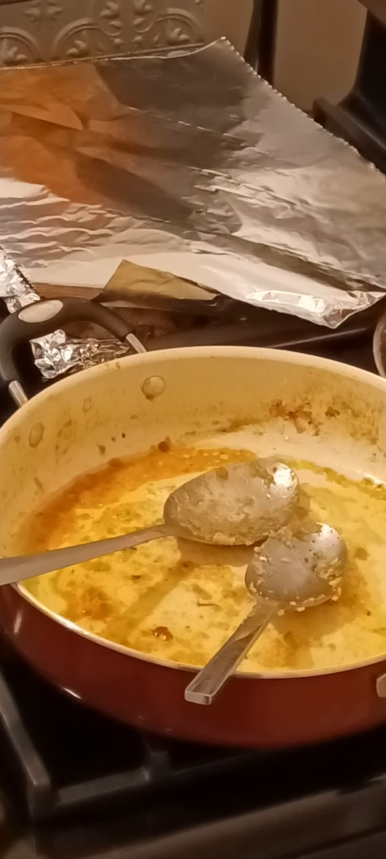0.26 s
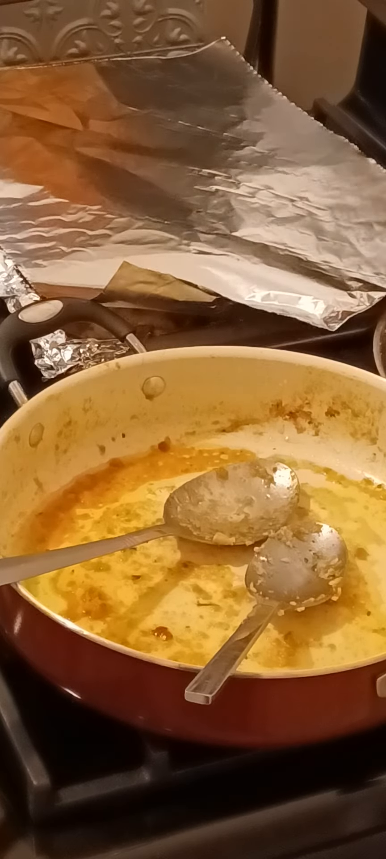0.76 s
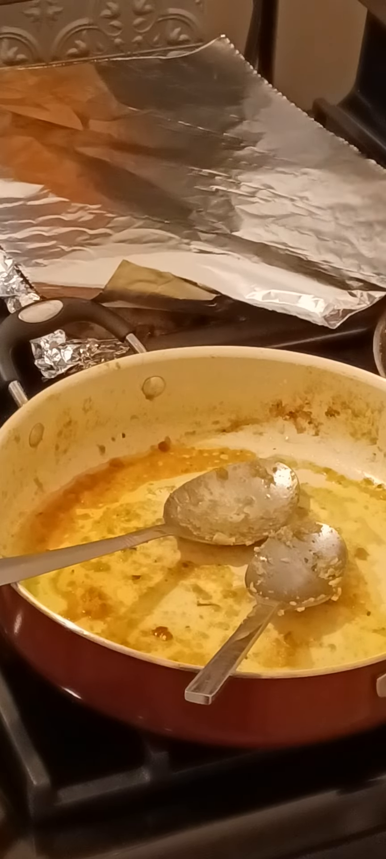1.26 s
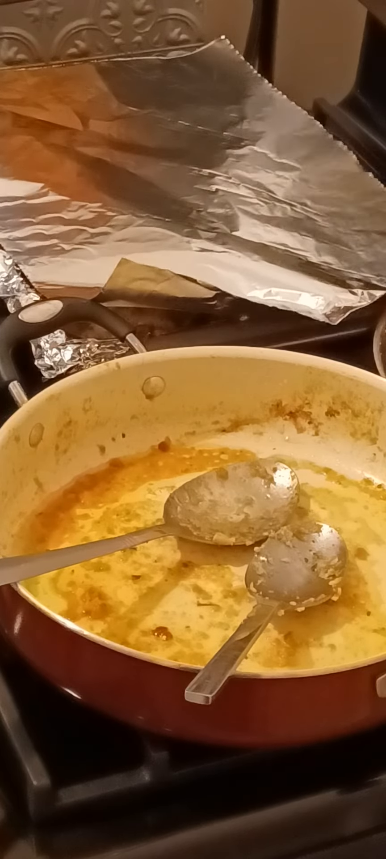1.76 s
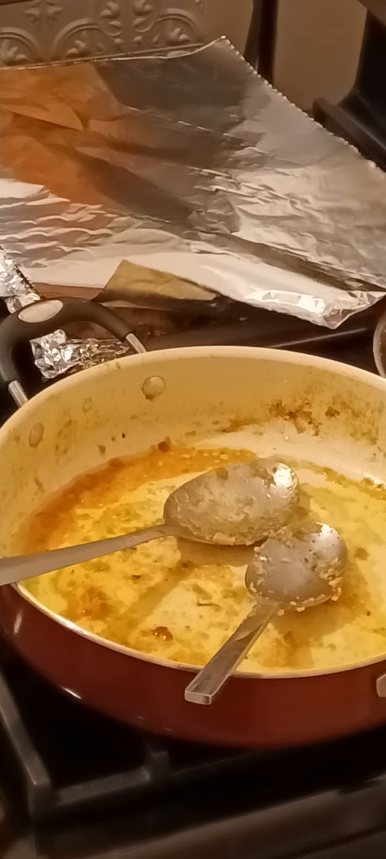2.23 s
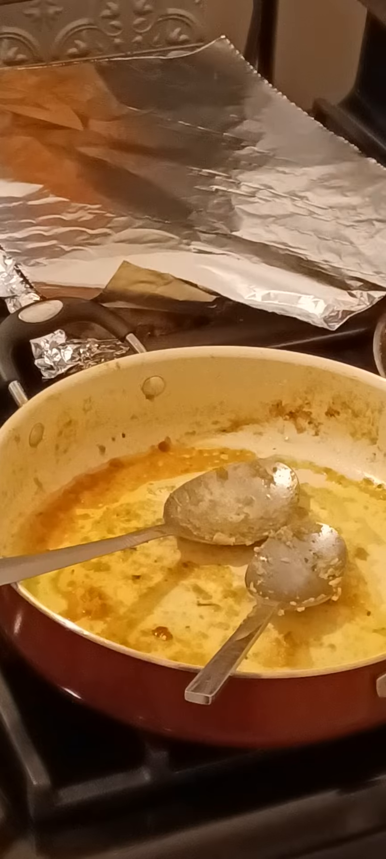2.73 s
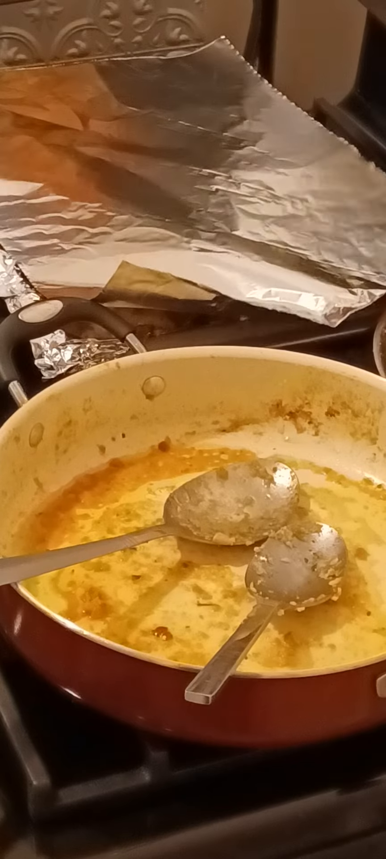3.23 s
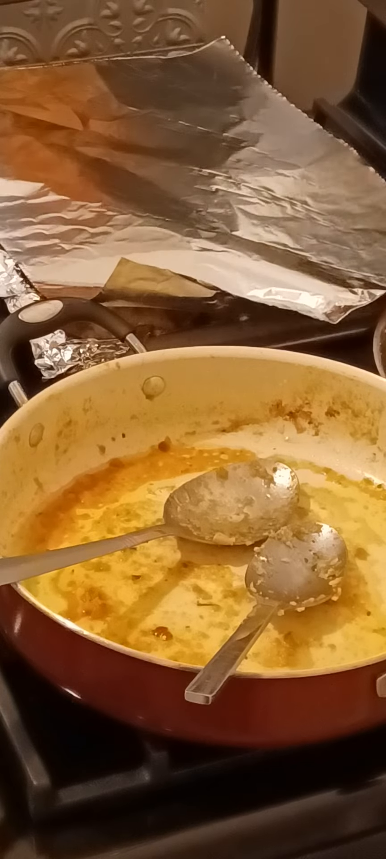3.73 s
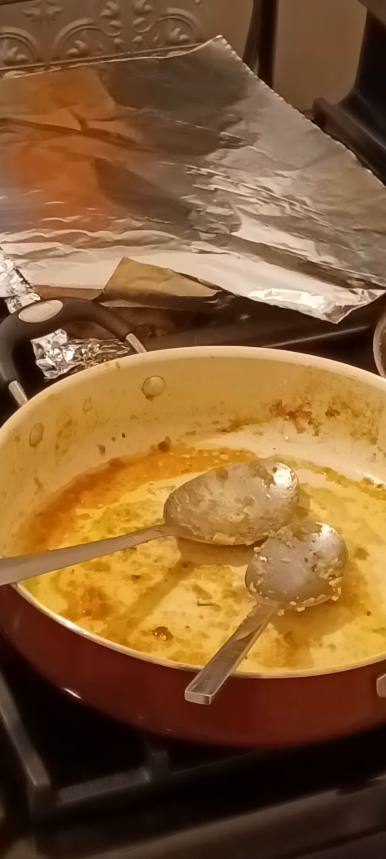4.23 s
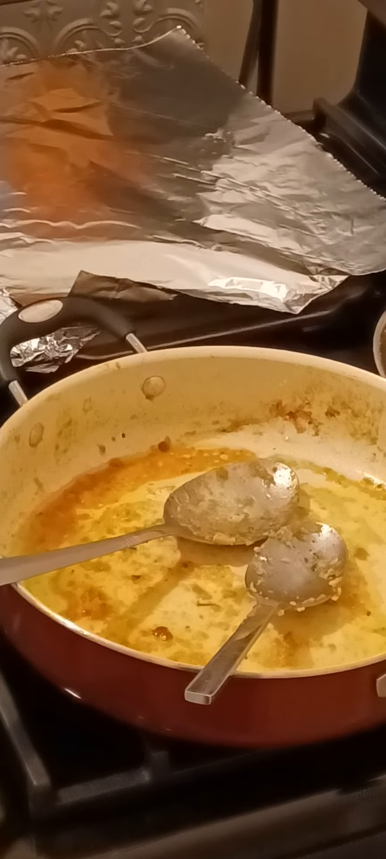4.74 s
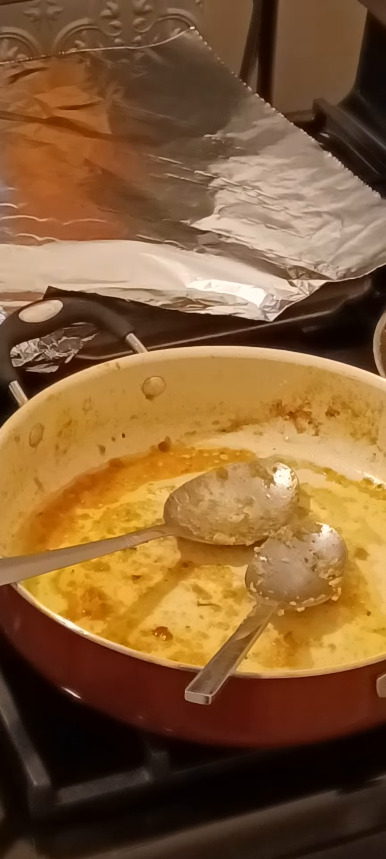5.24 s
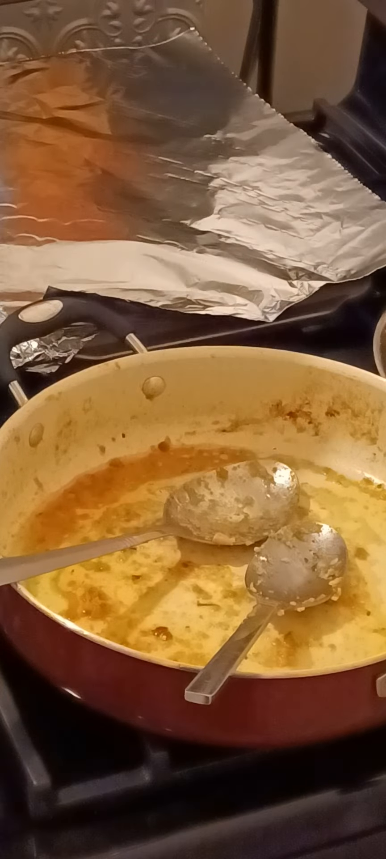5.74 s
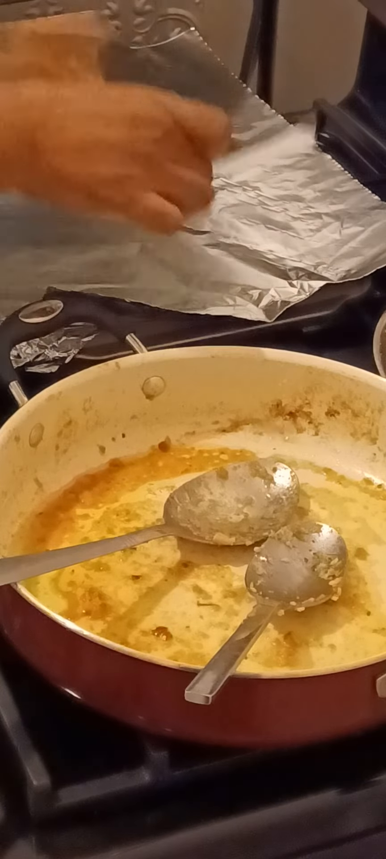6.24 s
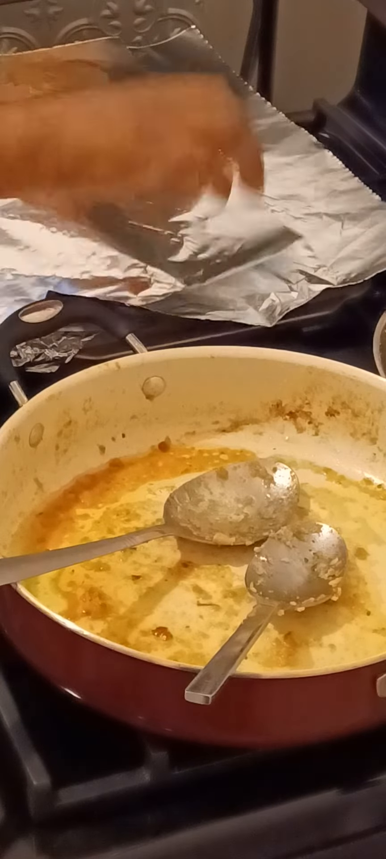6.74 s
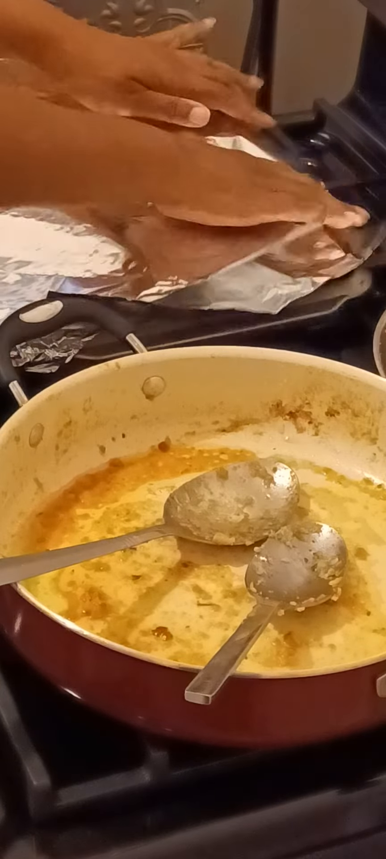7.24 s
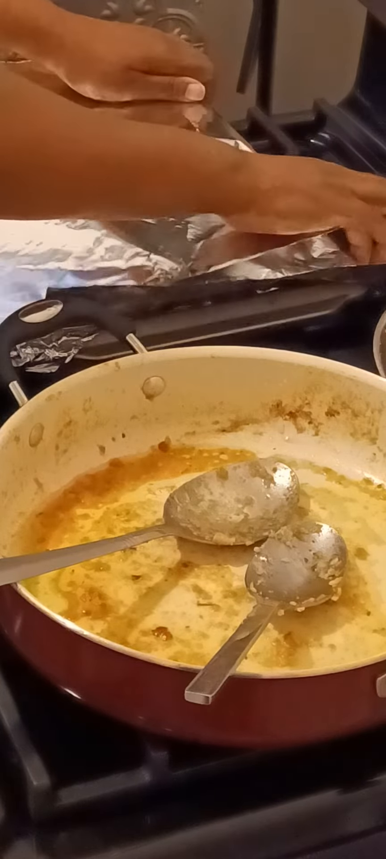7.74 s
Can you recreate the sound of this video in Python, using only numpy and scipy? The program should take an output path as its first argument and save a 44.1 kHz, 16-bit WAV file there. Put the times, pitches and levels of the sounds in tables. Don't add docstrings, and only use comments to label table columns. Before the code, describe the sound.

Dry, glittering aluminium foil crackle swells and fades irregularly as it is pressed over a ringing dish, with a low fridge drone behind.

```python
import sys
import numpy as np
from scipy import signal
from scipy.fft import rfft, irfft
from scipy.io import wavfile

SR = 44100
rng = np.random.default_rng(int(sys.argv[2]) if len(sys.argv) > 2 else 0)


def wav_out(sig):
    wavfile.write(sys.argv[1], SR, np.round(np.clip(np.atleast_2d(sig).T, -1, 1) * 32767).astype(np.int16))


def volts(x):
    e = np.asarray(x, float) / 20
    return 10 ** e


N = 351918
T = np.arange(N) / SR
HZ = np.fft.rfftfreq(N, 1 / SR) + 1e-3
TOP_HZ = 15830


def unit(x):
    return x / np.sqrt(np.mean(x ** 2))


def on_log(table):
    f, value = np.array(table).T
    return np.interp(np.log(HZ), np.log(f), value)


def curves(table):
    s, *columns = np.transpose(table)
    return [np.interp(T, s, c) for c in columns]


def peak(hz, width_hz):
    return 1 / (1 + 1j * (HZ ** 2 - hz ** 2) / (HZ * width_hz))


def band(lo_hz, hi_hz, order=3):
    low_cut = 1 + (lo_hz / HZ) ** (2 * order)
    high_cut = 1 + (HZ / hi_hz) ** (2 * order)
    return 1 / (low_cut * high_cut)


def tone(hz, wander_hz, t=T):
    steps = rng.standard_normal(400)
    drift = np.interp(t, np.linspace(0, N / SR, 400), steps)
    phase = 2 * np.pi * (hz * t + wander_hz * np.cumsum(drift) / SR) + 2 * steps[0]
    apart = steps[1] * min(hz / 900, 1.5) * np.array([[.5], [-.5]])
    return np.sqrt(2) * np.sin(phase + apart)


def swell(s, length):
    return np.cos(np.pi * np.clip((T - s) / length, -.5, .5)) ** 2


# f/Hz, likeness/0-1
PORT_LIKENESS = [(25, 0.6), (60, 0.5), (130, 0.99), (290, 0.8), (640, 0.29), (1400, 0)]


def port_likeness():
    return np.clip(on_log(PORT_LIKENESS), 0, 1)


def stereo_noise():
    like = port_likeness()
    mid, side = rfft(rng.standard_normal((2, N)))
    return np.sqrt(1 + like) * mid + np.sqrt(1 - like) * side * np.array([[1], [-1]])


def hiss():
    return volts(-76) * rfft(rng.standard_normal((2, N))) * band(20, 13000, order=2)


def flutter():
    rate_hz, depth_db = 21.92, 2.5
    steps = rng.standard_normal(400)
    return volts(depth_db * np.interp(T * rate_hz, np.arange(400), steps))


# t/s, length/s, level/dB
PANEL_THROBS = [(0.102, 0.067, -51.1), (0.297, 0.39, -51.5), (0.56, 0.43, -48.5), (0.83, 0.83, -51.5),
                (1.22, 0.18, -44.4), (1.46, 0.61, -46), (1.766, 0.085, -40), (2.26, 0.21, -51.0),
                (2.505, 0.32, -52), (2.874, 0.42, -48.5), (3.23, 0.3, -46), (3.44, 0.08, -49.5),
                (3.675, 0.29, -45), (3.876, 0.19, -48.5), (4.08, 0.24, -47.5), (4.25, 0.14, -50),
                (4.387, 0.14, -46), (4.617, 0.63, -42.5), (5.084, 0.21, -47), (5.237, 0.086, -49),
                (5.37, 0.14, -48.1), (5.633, 0.51, -47), (6.015, 0.19, -49), (6.23, 0.14, -48.5),
                (6.459, 0.46, -49.2), (6.75, 0.33, -47), (7.0, 0.36, -49.5), (7.245, 0.38, -45),
                (7.69, 0.76, -46), (7.966, 0.1, -44)]


def panel():
    throb = sum(volts(db) * swell(s, length) for s, length, db in PANEL_THROBS)
    return volts(1.0) * throb * tone(225.2, 7.95) * flutter()


# t/s, air level/dB, rumble minus air/dB
FRIDGE_LEVEL = [(0, -55, -4), (.3, -51, -6.5), (1.6, -51.5, -5.5), (1.9, -48.5, -4.5), (2.0, -55.5, -11),
                (2.65, -58.5, -6), (2.95, -57, -3), (3.5, -53.5, -4), (4.2, -53.5, -7), (4.45, -50, -8),
                (4.9, -54.5, -5.5), (5.1, -51.5, -8), (6.5, -52, -6.5), (7.0, -53.5, -7), (7.98, -50.5, -4)]
# f/Hz, wander/Hz, level over air/dB
MOTOR_LINES = [
    (163.5, 1.26, -6.5),
    (333.3, 1.94, -5),
    (318, 7.66, -7),
]
# f/Hz, level/dB per Hz
AIR_COLOUR = [(25, -36), (45, -38.5), (62, -23), (100, -15.5), (170, -6), (222, 0), (325, -9), (390, -13.5),
              (540, -14), (900, -21.5)]


def fridge():
    level, rumble = curves(FRIDGE_LEVEL)
    colour = volts(on_log(AIR_COLOUR))
    upper = volts(3.0) * unit(irfft(stereo_noise() * colour * band(140, 1100), N))
    lower = unit(irfft(stereo_noise() * colour * band(10, 127.4), N))
    lower = lower * volts(np.array([[1.2], [-.9]]))
    lines = sum(volts(db) * tone(f, w) for f, w, db in MOTOR_LINES)
    return volts(level) * (upper + volts(rumble) * lower + lines) + panel()


# t/s, length/s, f/Hz, width/Hz, level/dB
DISH_THUDS = [(2.805, .16, 90, 50, -52), (1.715, .06, 1450, 200, -32), (1.66, .1, 1720, 120, -36),
              (4.42, .3, 850, 700, -50), (4.53, .36, 1450, 600, -51), (4.66, .18, 1050, 500, -53),
              (7.25, .08, 575, 90, -48), (1.68, .12, 1300, 700, -33), (4.42, .2, 550, 120, -56),
              (1.8, .3, 550, 400, -36), (1.73, .1, 750, 400, -35), (1.64, .08, 500, 400, -44),
              (.26, .12, 400, 200, -54), (2.79, .14, 1100, 900, -50)]


def thuds():
    noise = stereo_noise()
    out = np.zeros((2, N))
    for s, length, f, w, db in DISH_THUDS:
        rub = unit(irfft(noise * peak(f, w) ** 2, N))
        out += volts(db) * swell(s, length) * rub
    return out


# f/Hz, wander/Hz, level/dB
DISH_MODES = [(367.6, 58, -37), (398, 13, -54), (530, 19, -47), (594, 19, -57), (777, 25, -32.5),
              (866, 31, -38), (1030, 29.2, -34.5), (1410, 51, -43), (1400, 29, -29.5), (1690, 15, -42),
              (2000, 21, -43), (2010, 15, -31)]
# t/s, length/s, f/Hz, wander/Hz, level/dB
DISH_RINGS = [
    (2.4, 0.11, 260, 13, -56),
    (1.43, 0.46, 474, 4.1, -54.5),
    (1.536, 0.28, 458, 5, -51),
    (4.43, 0.099, 360, 21, -50),
    (3.8, 0.1255, 290, 16, -53),
    (1.76, 0.14, 220, 33, -46),
    (1.9, 0.12, 350, 35, -43),
    (7.78, .4, 575, 28.3, -51.5),
]


def dish():
    press_s, length_s, share_db = 1.77, .38, -3
    press = [(press_s, length_s, f, w, db + share_db) for f, w, db in DISH_MODES]
    out = thuds()
    for s, length, f, w, db in DISH_RINGS + press:
        now = np.abs(T - s) < length / 2
        out[:, now] += volts(db) * swell(s, length)[now] * tone(f, w, T[now])
    return out


# t/s, t60/s, level/dB
DISH_KNOCKS = [
    (2.715, 0.2, -42),
    (2.763, 0.32, -35.5),
]
# f/Hz, wander/Hz, level in first knock/dB, level in second knock/dB
KNOCK_MODES = [(265, 21, -1, 1), (311, 22, -15, 1), (404, 40, -8, -4), (506, 11, 3, -9.5),
               (644, 60, -19, -10.5), (840, 35, -14, -6.5)]


def knocks():
    attack_s = 0.0036
    out = np.zeros((2, N))
    for k, (s, t60, db) in enumerate(DISH_KNOCKS):
        now = (T > s) & (T < s + 1)
        t = T[now] - s
        shape = (1 - np.exp(-t / attack_s)) * volts(db - 60 * t / t60)
        modes = sum(volts(m[2 + k]) * tone(m[0], m[1], T[now]) for m in KNOCK_MODES)
        out[:, now] += shape * modes
    return out


# t/s, lag of the right port/samples
HAND_LAG = [(0, 6), (5.4, 7), (6.1, 21), (8, 21)]


def creases():
    rate, spread_db, shiver_t60_s = 2200, 1.5, 0.2
    direct, tick_db = .12, -26
    chance = rng.random((3, N))
    clicks = (chance[0] < rate / SR) * volts(spread_db * np.log(chance[1] + 1e-9))
    energy = signal.fftconvolve(clicks ** 2, volts(-120 * T[:8192] / shiver_t60_s))[:N]
    shiver = unit(np.sqrt(np.abs(energy)) * rng.standard_normal((3, N)))
    ticks = unit(clicks * np.sign(chance[2] - .5))
    straight = np.sqrt(direct) * shiver[2] + volts(tick_db) * ticks
    lag = curves(HAND_LAG)[0].round()
    late = np.interp(np.arange(N) - lag, np.arange(N), straight)
    return np.sqrt(1 - direct) * shiver[:2] + np.array([straight, late])


# t of peak/s, rise/s, fall/s, level/dB, weight/dB (how much
FOIL_PRESSES = [(0.08, 0.027, 0.24, -49.5, -0.5), (0.22, 0.035, 0.2, -43, -0.5), (0.393, 0.17, 0.26, -39, 2),
                (0.53, 0.034, 1.5, -46.5, 4.5), (0.705, 0.44, 1.14, -33, -1), (0.94, 0.58, 0.35, -39.5, -6),
                (1.037, 0.51, 0.28, -41.5, -0.8), (1.216, 0.34, 0.52, -38.5, -1), (1.41, 0.3, 0.42, -43, 1.5),
                (1.577, 0.073, 0.29, -30.5, -6), (1.625, 0.059, 0.27, -34, 2), (1.675, 0.14, 0.16, -22, 1),
                (1.72, 0.14, 0.2, -21.5, 1.5), (1.79, .2, 0.17, -24, 0), (1.865, 0.38, 0.23, -23.5, -8),
                (2.174, 0.42, 0.39, -39.5, -2), (2.353, 0.07, 0.2, -51, 0.5), (2.501, 0.11, 0.23, -49, -2.5),
            (2.62, .04, .3, -46.5, 0), (2.66, 0.11, 0.62, -39, -6.5), (2.72, 0.053, 0.4, -47.5, 4.5),
            (2.917, 0.3, 0.11, -48, -3.5), (3.189, 0.11, 0.46, -45.5, 0.5), (3.438, 0.04, 0.47, -46, 0.5),
            (3.592, 0.064, 0.28, -52.5, 1), (3.73, 0.13, 0.21, -51.5, 4), (3.955, .03, .2, -56, -3),
            (4.015, 0.1, 0.1, -44, -1.5), (4.077, 0.19, 0.29, -36.5, -1.5), (4.575, 0.15, 0.35, -58, 8.5),
            (4.865, 0.15, 1.0, -53, -12),
                (5.005, 0.088, 0.98, -46.5, -0.5), (5.186, 0.13, 0.47, -34.5, -3), (5.29, 0.09, 0.3, -35.5, -5),
           (5.395, 0.45, 0.13, -41, -0.5), (5.526, 0.13, 0.3, -36, -2), (5.762, 0.28, 0.53, -38, -3),
           (5.818, 0.2, 0.4, -35.5, -1.5), (5.932, 0.095, 0.47, -27.5, -4), (6.119, 0.44, 0.29, -34, -2.5),
           (6.222, 0.1, 0.39, -33, -5.5), (6.32, 0.34, 0.29, -28.5, -6.5), (6.519, 0.27, 0.12, -46.5, 1.5),
           (6.68, 0.052, 0.2, -43, -1.5), (6.75, .2, .15, -41.5, -1.5), (6.81, 0.24, 0.16, -36, -1),
           (7.028, 0.023, 0.14, -54, -9), (7.203, 0.02, 1.4, -38, -0.5), (7.243, 0.05, 0.14, -32, -2.5),
           (7.278, .06, 0.13, -37, -0.5), (7.5, 0.29, 1.2, -44, 0), (7.7, 0.41, 1.4, -42, 3),
           (7.971, 0.28, 1.0, -38.5, 1.5),
                (0.068, .015, .15, -49, -10),
    (7.188, 0.017, 0.26, -44, -8),
    (5.14, .03, 0.12, -44, 1),
    (6.655, .03, 0.152, -44.5, -3),
    (5.6, 0.041, .15, -54, 3),
    (7.42, .05, 0.093, -49.5, 7.5),
    (7.6, .1, .25, -48, 7),
]
# t/s, level/dB
LOOSE_RUSTLE = [(0, -56), (.4, -53.5), (1.5, -55), (2.0, -65), (2.6, -55.5), (3.9, -56), (4.25, -56.5),
                (4.4, -57.5), (4.75, -59.5), (5.2, -55), (6.6, -56), (6.88, -58), (6.99, -65), (7.09, -67),
                (7.17, -76), (7.3, -54), (8, -50)]


def presses(db, stretch, share, gain, rustle_db):
    medium_db, swing_db = -38, 30
    t = T[::64]
    events = np.array(FOIL_PRESSES)
    s, rise, fall, level, weight = events.T[:, :, None]
    before = (s - t) / np.maximum(rise, .01)
    after = (t - s) / np.maximum(fall * stretch, .01)
    away = np.where(t < s, before, after)
    each = level + db + share * weight + gain * (level - medium_db) - swing_db * away
    power = np.interp(T, t, (volts(each) ** 2).sum(axis=0))
    return np.sqrt(power + volts(curves(LOOSE_RUSTLE)[0] + rustle_db) ** 2)


# f/Hz, level/dB per Hz
FOIL_COLOUR = [(180, -37.5), (300, -3), (326, -8), (366, -4), (501, -14), (562, -10.5), (757, -10.5),
               (1180, -6.5), (1940, -4), (5880, -3.5), (8600, -3.5), (12600, 0.5), (15600, -4)]
# f/Hz, left minus right/dB
PORT_BALANCE = [(60, 5), (110, 8), (200, -2), (380, 2), (700, 1), (1290, -0.5), (2380, 0.0), (4400, 2),
                (8120, 3), (15000, 1.5)]
LAYER_EDGES = [380, 800, 2000, 4000, 7000, 12500, 30000]
# level/dB, fall stretch/ratio, share of weight/ratio, gain/dB per dB of press, rustle/dB
FOIL_LAYERS = [
    (-18, 1.75, 2.6, -.05, -8.5),
    (-8, 1.48, 1.82, -0.0026, -5.5),
    (-4.5, 1.46, 0.51, -0.138, -1.5),
    (-2.92, 1.32, 0.17, -0.1161, -8.5),
    (-1.9, 0.86, 0.11, 0, -13),
    (-6, 0.72, 0.52, 0.31, -29),
]


def foil():
    balance = np.array([[.5], [-.5]]) * on_log(PORT_BALANCE)
    sheet = rfft(creases()) * volts(on_log(FOIL_COLOUR) + balance)
    like = port_likeness()
    sheet = (1 - like) * sheet + like * sheet.mean(axis=0)
    out = np.zeros((2, N))
    for lo, hi, layer in zip(LAYER_EDGES, LAYER_EDGES[1:], FOIL_LAYERS):
        crackle = unit(irfft(sheet * band(lo, hi) * (HZ < TOP_HZ), N))
        out += crackle * presses(*layer)
    return out


def scene():
    return fridge() + dish() + knocks() + foil()


def top_cut(x):
    return signal.sosfilt(signal.butter(12, 16970, fs=SR, output="sos"), x)


def record(dry):
    mix = irfft((rfft(dry) + hiss()) * (HZ < TOP_HZ), N)
    return top_cut(mix)


dry = scene()
out = record(dry)
wav_out(out)
```